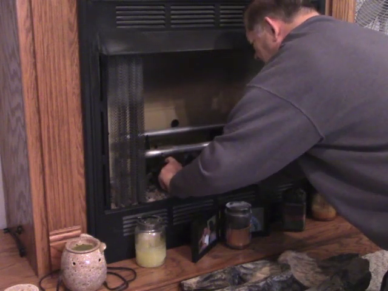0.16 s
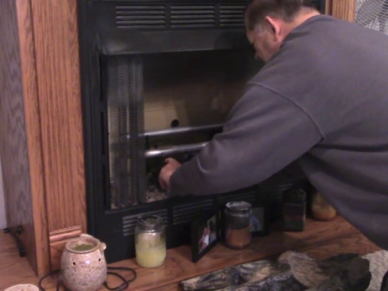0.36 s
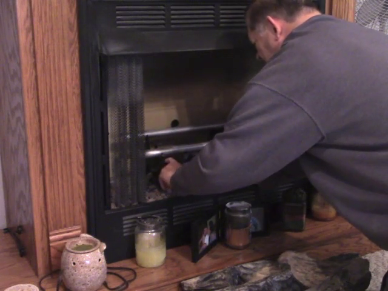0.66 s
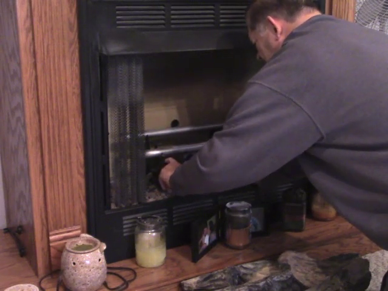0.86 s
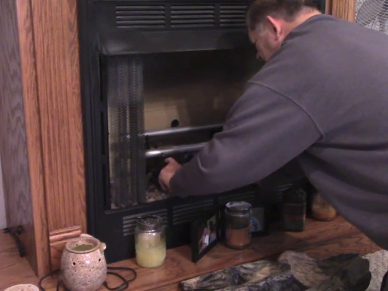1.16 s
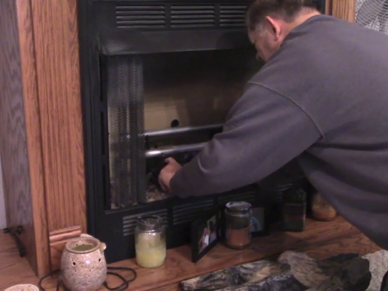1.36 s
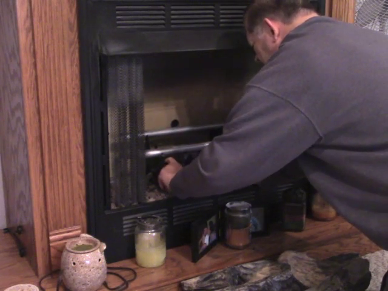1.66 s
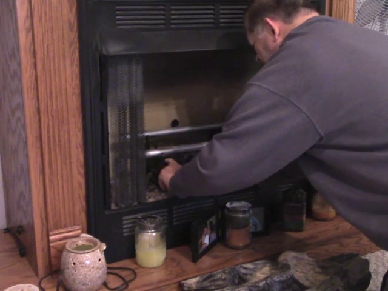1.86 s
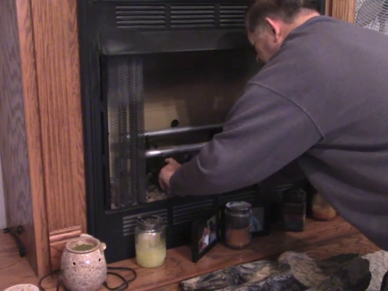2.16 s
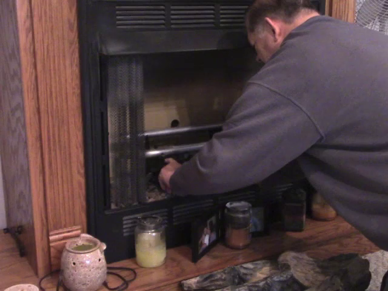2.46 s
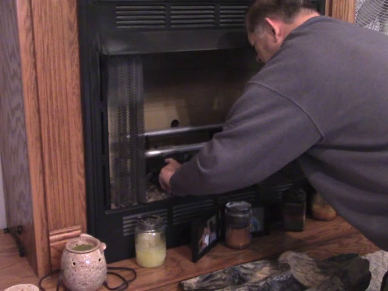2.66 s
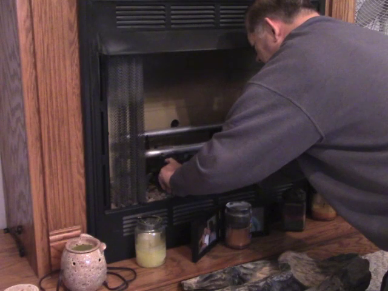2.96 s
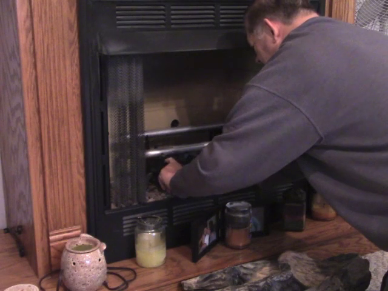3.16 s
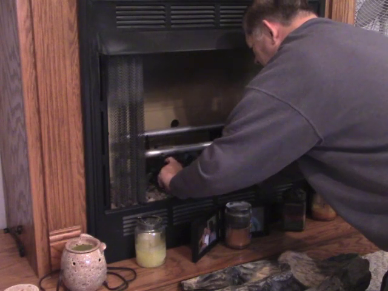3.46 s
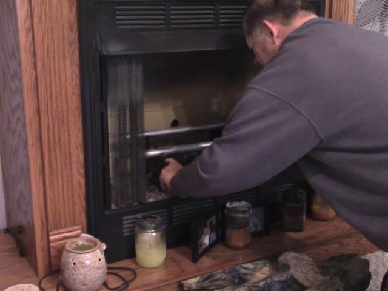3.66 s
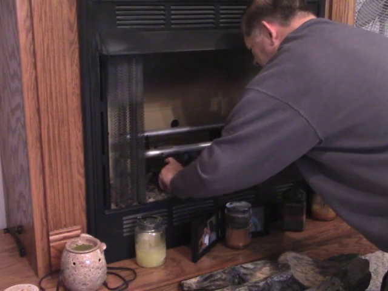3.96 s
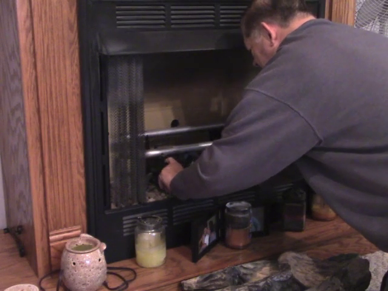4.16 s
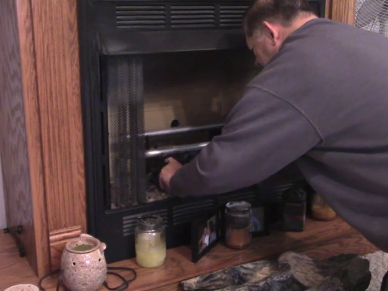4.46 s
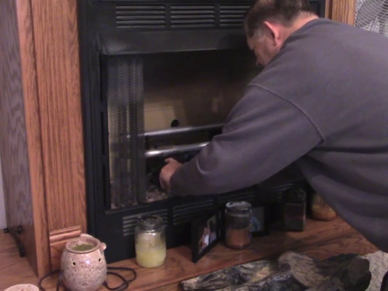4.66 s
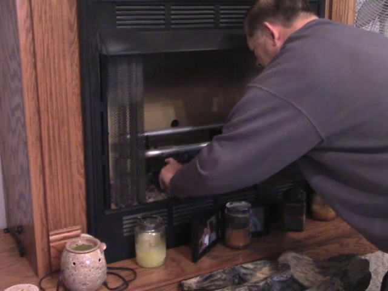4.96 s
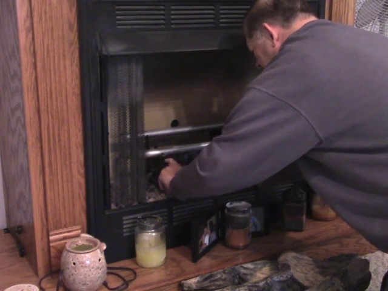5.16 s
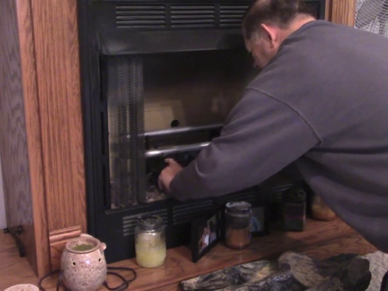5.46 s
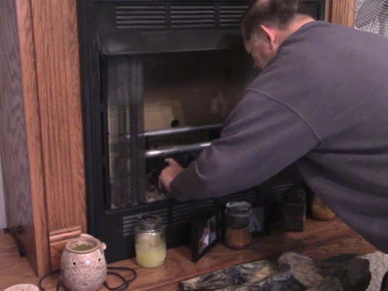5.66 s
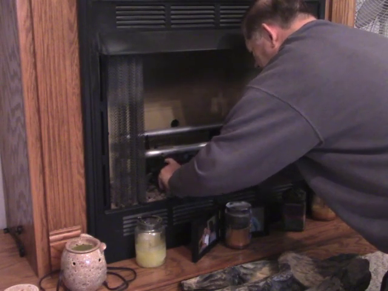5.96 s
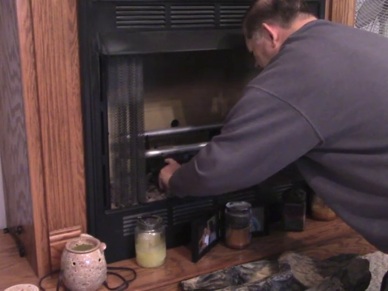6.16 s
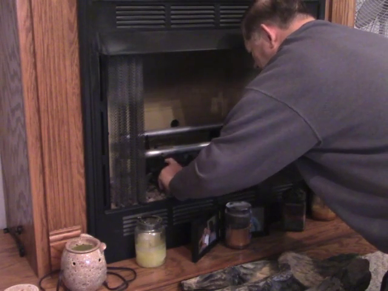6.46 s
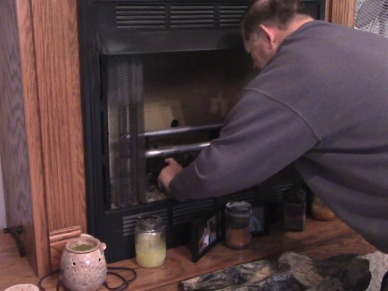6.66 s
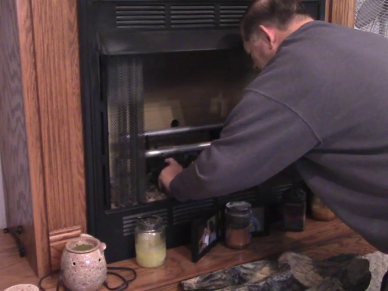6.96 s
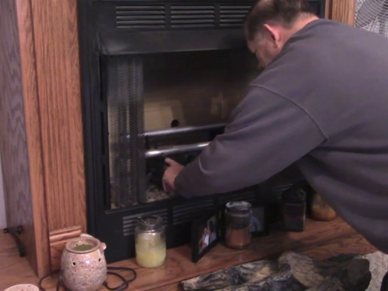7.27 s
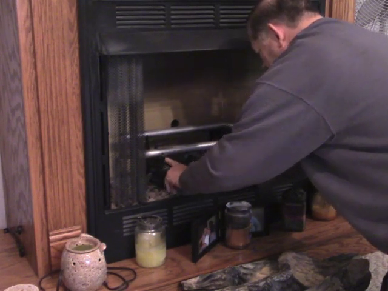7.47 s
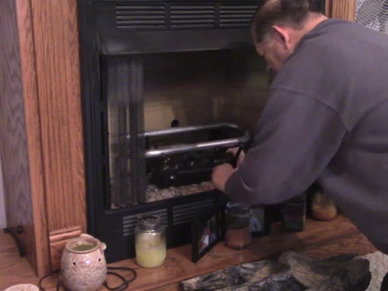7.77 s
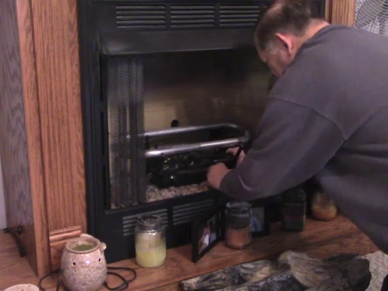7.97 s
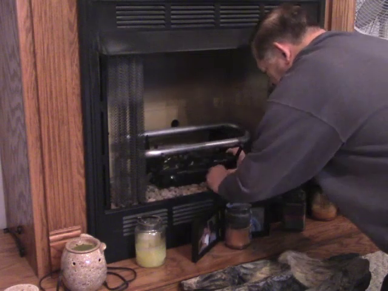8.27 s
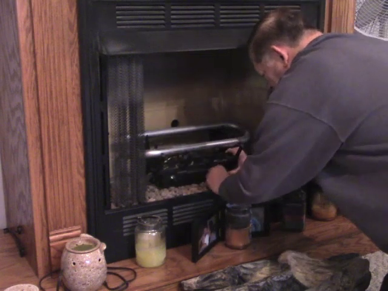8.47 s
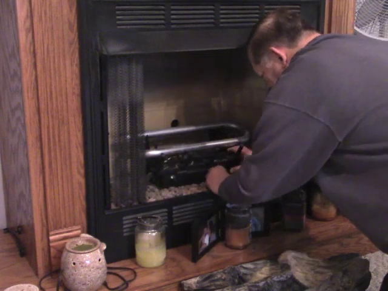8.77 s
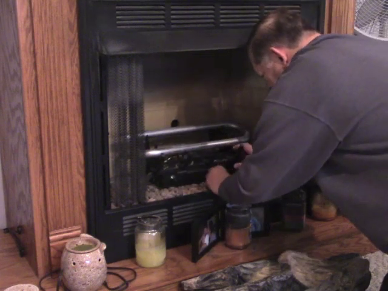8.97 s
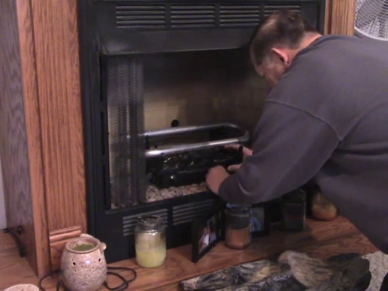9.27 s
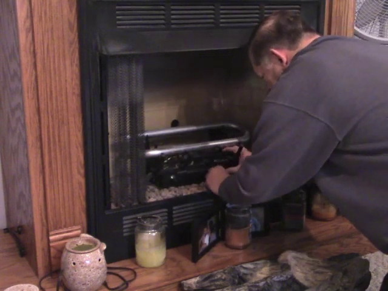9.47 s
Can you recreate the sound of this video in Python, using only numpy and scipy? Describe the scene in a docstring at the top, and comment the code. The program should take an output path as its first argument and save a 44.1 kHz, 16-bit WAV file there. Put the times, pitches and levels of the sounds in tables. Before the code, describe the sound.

Over a faint hiss of gas and room air, a fireplace igniter cracks six times, roughly a second or so apart, each bright metallic snap answered by the softer click of the released button. A hand bumps the metalwork now and then, and near the end it clicks at the controls and quietly turns a knob. The sound is heard through a single microphone in a living room with a short echo.

```python
"""A gas fireplace's piezo igniter, pressed six times in a living room, heard on one microphone.
Each snap of the spring hammer rings the metal firebox; the button clicks back a moment later.
The far wall returns a slap, the room a short tail, and the camera's limiter squashes each snap.
Near the open front of the hearth, a hand fiddles with the controls and turns a knob.
Behind it all lie soft ticks, a faint hum and the steady hiss of gas and room air."""
import sys
import numpy as np
from scipy import signal
from scipy.fft import rfft, irfft
from scipy.io import wavfile
from scipy.ndimage import uniform_filter1d

SR = 44100
rng = np.random.default_rng(int(sys.argv[2]) if len(sys.argv) > 2 else 0)


def persist_wave(psi):
    """Save psi, clipped to +-1, as 16-bit WAV."""
    counts = np.round(np.clip(psi, -1, 1) * 32767).astype(np.int16)
    wavfile.write(sys.argv[1], SR, np.atleast_2d(counts).T)


N = 424241
T = np.arange(int(1.4 * SR)) / SR  # time axis of one event

# Levels in the tables are relative, except the hum's.
# the hammer hits the crystal: start_s
SNAP_TIMES = [0.0142, 1.5307, 3.3482, 4.0671, 5.537, 6.7258]
# spectrum of the hammer's crack: frequency_hz, level_db
CRACK_SPECTRUM = [(90, -42), (200, -41.5), (800, -14), (1220, -9), (1750, 4.5), (2250, -4), (2600, -5),
                  (3100, 3.5), (3450, -3.5), (4100, 2), (4800, -2), (6100, 1.96), (7200, -5), (8300, -5),
                  (11500, -7.5), (15500, -23)]
# spectrum of the shaken panels: frequency_hz, level_db
PANEL_SPECTRUM = [(80, -42), (150, -18), (200, -7), (260, -9), (330, -1.5), (620, -5.5), (820, 2.5),
                  (1080, -3), (1500, -9), (4000, -29.5)]
# the ring of firebox and hearth: pitch_hz, level_db, t60_s
FIREBOX_MODES = [(134, -34, 0.9), (190, -22, 0.6), (217, -21, 0.54), (350, -15.5, 1.25), (358, -13, 0.42),
                 (373, -10, 0.7), (495, -6.5, 0.5), (775, -8.3, 0.65), (797, -14, 0.55), (850, -16, 0.45),
                 (1008, -9.5, 0.42), (1039, -11, 0.48), (1420, -2, 0.26), (1451, -1, 0.32),
                 (1635, -6.5, 0.22), (1693, -3.8, 0.27), (1889, 7, 0.23), (2113, -7, 0.23),
                 (2411, -3, 0.26), (3020, -3, 0.22), (3074, 4, 0.22), (4044, -2, 0.2), (4221, 0, 0.2),
                 (4983, -5, 0.22), (5849, -3.5, 0.21), (6065, 0, 0.15), (6153, -1, 0.16), (6851, -13, 0.45),
                 (8200, -2, 0.1), (11960, -13, 0.24)]

# the button springs back: start_s, level_db
BUTTON_RETURNS = [(0.367, -3.5), (1.8751, -2), (3.6918, -5), (4.608, -6), (6.0129, -6), (7.264, -1)]
# spectrum of small plastic parts: frequency_hz, level_db
PLASTIC_SPECTRUM = [(70, -27.5), (200, -10.5), (480, -1.5), (900, -3), (1600, -3.5), (3200, 3),
                    (4800, -1.5), (7500, 1), (11000, -5.5), (15500, -27.5)]
# the button's own ring: pitch_hz, level_db, t60_s
BUTTON_MODES = [(513, -1.5, 0.22), (1424, -3.5, 0.11), (1875, -1.5, 0.12), (2412, -0.5, 0.1),
                (3120, 3, 0.08), (3720, 0, 0.059), (4230, -3, 0.046), (6400, -8.5, 0.05),
                (7900, -5.5, 0.057)]
# a fingertip or nail clicks on the controls: start_s, level_db, rise_s
FINGER_CLICKS = [(5.866, -18.5, 0.002), (7.44, -18.5, 0.0045), (8.07, -20.5, 0.0045),
                 (8.1837, -12.3, 0.0019), (8.702, -24.5, 0.00086)]
# the soft side of the hand bumps the metalwork: start_s, level_db
HAND_BUMPS = [(0.753, -10.5), (6.172, -15), (8.1, -14)]
# spectrum of fingers on metal and plastic: frequency_hz, level_db
SCUFF_SPECTRUM = [(100, -22), (480, -1.5), (900, -7), (1700, 2.5), (2500, 2), (3300, -6), (4100, 0),
                  (5200, -9.5), (6400, -0.5), (7600, -6), (10500, -12), (15500, -26)]
# the knob's ring: pitch_hz, level_db, t60_s
KNOB_MODES = [(1670, -5, 0.09), (2492, 0, 0.15), (2923, -10, 0.15), (3601, -4, 0.088), (4683, -9, 0.12),
              (6300, -7, 0.14)]

# close reflections off hearth and floor: delay_s, gain
NEAR_ECHOES = [(0.0016, 0.93), (0.0041, 0.85)]
# slaps off the far wall: delay_s, gain
WALL_SLAPS = [(0.0428, 0.6), (0.046, 0.6)]
# the colour of those slaps: frequency_hz, level_db
WALL_SPECTRUM = [(100, -3), (1500, -2.5), (3300, -3), (4100, -0.5), (4900, -2.5), (6000, -5), (8000, -9.5),
                 (15000, -11.5)]
# the living room's decay: frequency_hz, t60_s
ROOM_DECAY = [(40, 0.5), (170, 1.05), (330, 1.0), (700, 0.63), (1300, 0.46), (3000, 0.37), (6000, 0.32),
              (10000, 0.27), (15000, 0.225)]
# spectrum of gas and room air: frequency_hz, level_db
HISS_SPECTRUM = [(20, -18), (75, -18.5), (105, -4.5), (160, -2), (350, 1.5), (700, -4), (980, -1),
                 (1120, -9), (1550, -7.5), (3000, -15), (6000, -21), (10000, -28), (13000, -33.5),
                 (16000, -46.5)]
# faint hum and whine: pitch_hz, rms_level_db
HUM_TONES = [(120, -75.5), (364, -72.5), (1540, -78), (5560, -87.5)]


def igniter(space, rebound_s=0.00202, rebound_gain=0.29):
    """The same spring drives every blow: a bright crack at once, then the panels and their ring swell."""
    crack = gain_of(26) * colour(burst(rise_s=0.0002, t60_s=0.022), CRACK_SPECTRUM)
    # the back of the firebox returns the crack, which combs its treble
    add(crack, rebound_s, rebound_gain * crack)
    panels = gain_of(13.5) * colour(burst(rise_s=0.02, t60_s=0.12), PANEL_SPECTRUM)
    firebox = gain_of(-12) * ring(FIREBOX_MODES)
    snap = convolve(crack + panels, space) + firebox + thump()
    out = np.zeros(N)
    for start_s in SNAP_TIMES:
        # loose parts rattle a little differently each time
        rattle = gain_of(12) * colour(burst(rise_s=0.00061, t60_s=0.025), CRACK_SPECTRUM)
        add(out, start_s, snap + convolve(rattle, space))
    return gain_of(-6.5) * out


def thump(width_s=0.0032):
    """The brief, deep push that comes with a snap."""
    age = T / width_s
    return gain_of(-36) * age * (2 - age) * np.exp(-age)


def button():
    """Let go, the button clicks back, rings, and lightly rings the firebox."""
    out = np.zeros(N)
    for start_s, level_db in BUTTON_RETURNS:
        tilt = -0.94 + 0.56 * level_db  # the firmer, the brighter
        click = colour(burst(rise_s=0.003, t60_s=0.068), PLASTIC_SPECTRUM, tilt)
        own_ring = gain_of(-2) * unit(ring(BUTTON_MODES, rise_cycles=3.6, beat_hz=80.5))
        firebox = gain_of(-9) * unit(colour(ring(FIREBOX_MODES), PLASTIC_SPECTRUM, db_per_octave=-3))
        add(out, start_s, gain_of(level_db - 3) * (click + own_ring + firebox))
    return out


def fingers():
    """Hard contacts on the controls are short and bright, soft ones slow and dull."""
    out = np.zeros(N)
    for start_s, level_db, rise_s in FINGER_CLICKS:
        click = colour(burst(rise_s, t60_s=30 * rise_s), SCUFF_SPECTRUM, db_per_octave=2)
        add(out, start_s, gain_of(level_db) * click)
    for start_s, level_db in HAND_BUMPS:
        bump = colour(burst(rise_s=0.009, t60_s=0.23), SCUFF_SPECTRUM, db_per_octave=-11.5)
        add(out, start_s, gain_of(level_db) * bump)
    return out


def knob(start_s=8.745, length_s=0.72, slips=4, jitter_s=0.015, fade_db_per_s=7.5, catch_s=8.785):
    """The turning knob sticks and slips, ever fainter, and clinks once where it catches."""
    out = np.zeros(N)
    for elapsed_s in np.arange(slips) * length_s / slips:
        slip = colour(burst(rise_s=0.01, t60_s=0.21), SCUFF_SPECTRUM, db_per_octave=-2)
        slip_s = start_s + elapsed_s + jitter_s * rng.uniform(-1, 1)
        add(out, slip_s, gain_of(-21 - fade_db_per_s * elapsed_s) * slip)
    click = colour(burst(rise_s=0.0018, t60_s=0.09), SCUFF_SPECTRUM, db_per_octave=-1.6)
    clink = click + gain_of(-1) * unit(ring(KNOB_MODES))
    add(out, catch_s, gain_of(-17) * clink)
    return out


def handling(space):
    """Clicks and scuffs at the hearth's open front reach the microphone directly and through the room."""
    direct = button() + gain_of(-4.5) * (fingers() + knob())
    return direct / 2 + gain_of(-6) * convolve(direct, space)


def living_room(wall_gain, tail_db, scatter_db, hearth_db):
    """The paths to the microphone: direct, off the nearby hearth, off the far wall, and a diffuse tail."""
    hz, t, bands = signal.stft(rng.choice([-1., 1.], len(T)), SR, nperseg=256)
    build_up = 1 - np.exp(-(t / 0.03) ** 2)
    bands = bands * decay(t, curve_at(ROOM_DECAY, hz)[:, None]) * build_up
    tail = signal.istft(bands, SR, nperseg=256)[1][:len(T)]
    response = gain_of(tail_db) * unit(tail)
    response += gain_of(hearth_db) * burst(rise_s=0.001, t60_s=0.09)
    response[0] += 1  # direct path
    for delay_s, gain in NEAR_ECHOES:
        add(response, delay_s, gain * burst(rise_s=0.0001, t60_s=0.0072))
    for delay_s, gain in WALL_SLAPS:
        slap = colour(burst(rise_s=0.0003, t60_s=0.011), WALL_SPECTRUM)
        add(response, delay_s, wall_gain * gain * slap)
    scatter = gain_of(scatter_db) * burst(rise_s=0.002, t60_s=0.1)
    add(response, WALL_SLAPS[0][0], wall_gain * scatter)  # arrives with the first slap
    return unit(response)


def faint_ticking(step_s=0.06, share=0.35, centre_hz=1950, grow_db_per_s=0.5, width_s=0.0019):
    """Soft, narrow ticks on a steady clock, most of them skipped: perhaps the camera's focus motor."""
    out = np.zeros(N)
    clock = np.arange(0, N / SR, step_s)
    envelope = np.exp(-(T / width_s - 2) ** 2)
    for start_s, (chance, size, detune) in zip(clock, rng.random((len(clock), 3))):
        if chance < share:
            pitch_hz = centre_hz * (0.85 + 0.3 * detune)
            gain = gain_of(-50 + grow_db_per_s * (start_s - N / SR)) * (0.5 + size / 2)
            add(out, start_s, gain * envelope * np.sin(2 * np.pi * pitch_hz * T))
    return out


def room_tone(hiss_db=-58, waver_hz=3):
    """Faint hiss of gas and room air, with a slightly wavering hum."""
    spectrum = gain_of(curve_at(HISS_SPECTRUM, np.fft.rfftfreq(N, 1 / SR)))
    hiss = irfft(rfft(rng.standard_normal(N)) * spectrum, N)
    out = gain_of(hiss_db) * hiss / hiss.std()
    for pitch_hz, level_db in HUM_TONES:
        drift = np.interp(np.arange(N), np.linspace(0, N, 100), rng.standard_normal(100))
        phase = 2 * np.pi * np.cumsum(pitch_hz + waver_hz * drift) / SR
        out += gain_of(level_db) * np.sqrt(2) * np.sin(phase)
    return out


def ring(modes, rise_cycles=7, beat_hz=40):
    """Modes swell over a few cycles and die; as reflections take over, each one beats unevenly."""
    out = np.zeros(len(T))
    beat_depth = 0.4 * (1 - decay(T, 0.25))
    for pitch_hz, level_db, t60_s in modes:
        knots = rng.standard_normal(256) + 1j * rng.standard_normal(256)
        wander = 1 + beat_depth * np.interp(T * beat_hz, np.arange(len(knots)), knots)
        tone = (wander * np.exp(2j * np.pi * (pitch_hz * T + rng.random()))).real
        swell = 1 - np.exp(-T * pitch_hz / rise_cycles)
        out += gain_of(level_db) * tone * decay(T, t60_s) * swell
    return out


def burst(rise_s, t60_s):
    """The dense chatter of a struck part: a short noise burst with an even spectrum."""
    envelope = (1 - np.exp(-T / rise_s)) * decay(T, t60_s)
    chatter = envelope * rng.standard_normal(len(T))
    for _ in range(4):  # flatten the spectrum, then restore the envelope
        flat = irfft(np.exp(1j * np.angle(rfft(chatter))), len(T))
        local_rms = np.sqrt(abs(uniform_filter1d(flat ** 2, 100)) + 1e-14)
        chatter = envelope * flat / local_rms
    return unit(chatter)


def colour(sound, spectrum, db_per_octave=0):
    """Minimum-phase filter with this spectrum, tilted above 1 kHz; keeps the energy of white sound."""
    hz = abs(np.fft.fftfreq(8192, 1 / SR))
    gain = gain_of(curve_at(spectrum, hz) + db_per_octave * np.log2(np.maximum(hz, 1000)))
    log_response = np.conj(signal.hilbert(np.log(gain)))
    taps = np.fft.ifft(np.exp(log_response)).real
    return convolve(sound, unit(taps[:len(taps) // 2]))


def convolve(sound, response):
    """Passes a sound through an impulse response, keeping its length."""
    return signal.fftconvolve(sound, response)[:len(sound)]


def curve_at(table, hz):
    """Reads a table along a log-frequency axis."""
    table_hz, values = np.transpose(table)
    return np.interp(np.log(hz + 1), np.log(table_hz), values)


def decay(t, t60_s):
    """An exponential fall of 60 dB in t60_s."""
    return np.exp(-np.log(1000) * t / t60_s)


def gain_of(db):
    """Decibels to gain."""
    return 10 ** (db / 20)


def unit(sound):
    """Scales to an energy of one."""
    return sound / np.linalg.norm(sound)


def add(mix, start_s, sound):
    """Mixes a sound in at start_s."""
    part = mix[round(start_s * SR):][:len(sound)]
    part += sound[:len(part)]


def scene():
    """The firebox beams each snap at the far wall; the hand's small sounds send less that way."""
    hand_room = living_room(wall_gain=0.36, tail_db=0.5, scatter_db=-3, hearth_db=2)
    snap_room = living_room(wall_gain=0.9, tail_db=-0.4, scatter_db=-3.5, hearth_db=-2)
    return (igniter(snap_room) + handling(hand_room) + faint_ticking() + room_tone())[None]


def record(dry, recover_db_per_s=230, cutoff_hz=15900):
    """After the microphone, a limiter clamps peaks at once and soon lets go; a low-pass follows."""
    over_db = np.maximum(20 * np.log10(abs(dry[0]) + 1e-9), 0)
    recovery_db = np.arange(N) * recover_db_per_s / SR
    duck_db = np.maximum.accumulate(over_db + recovery_db) - recovery_db
    lowpass = signal.firwin(301, cutoff_hz, window=("kaiser", 8), fs=SR)
    return signal.oaconvolve(dry * gain_of(-duck_db), lowpass[None], "same")


dry = scene()
out = record(dry)
persist_wave(out)
```